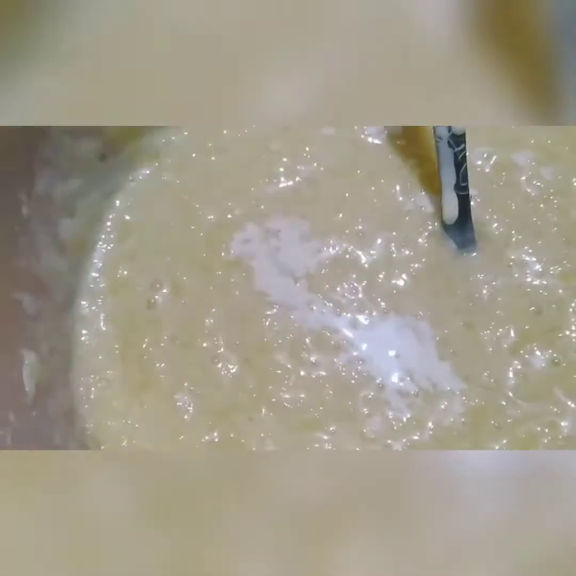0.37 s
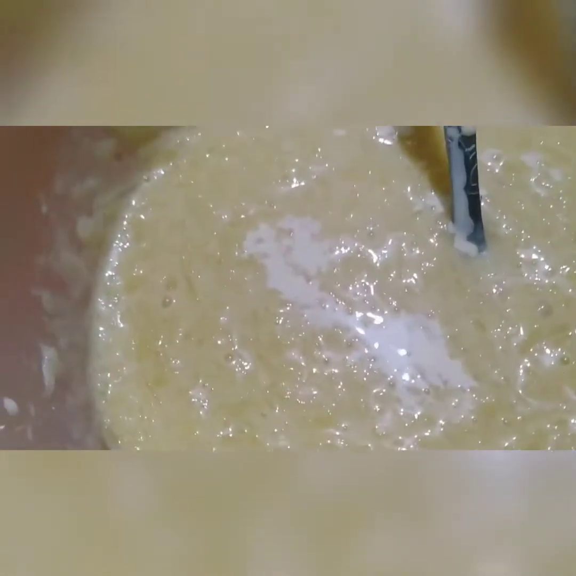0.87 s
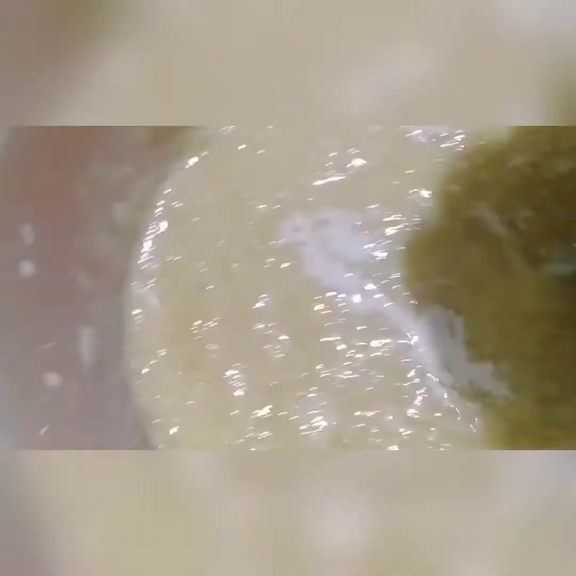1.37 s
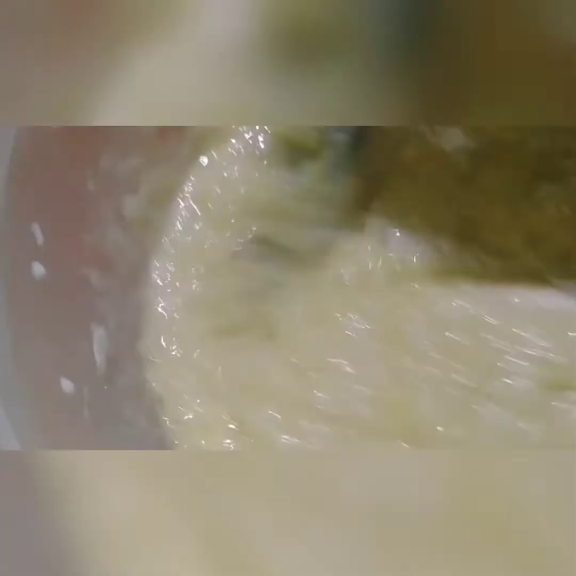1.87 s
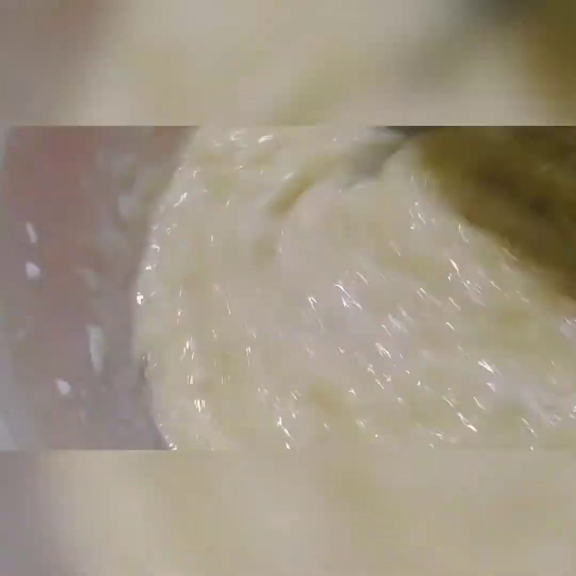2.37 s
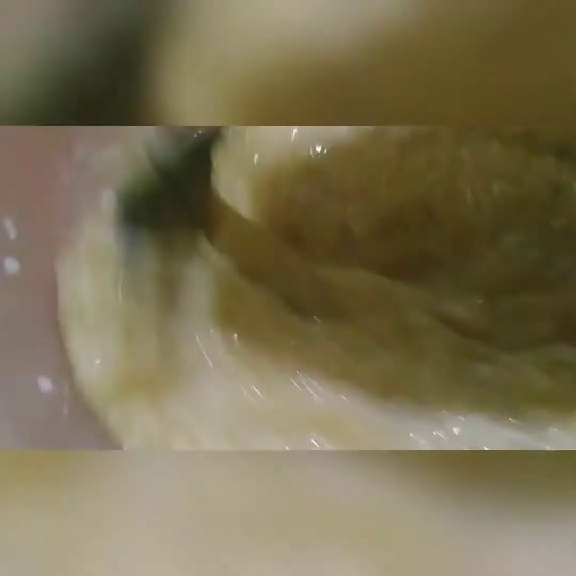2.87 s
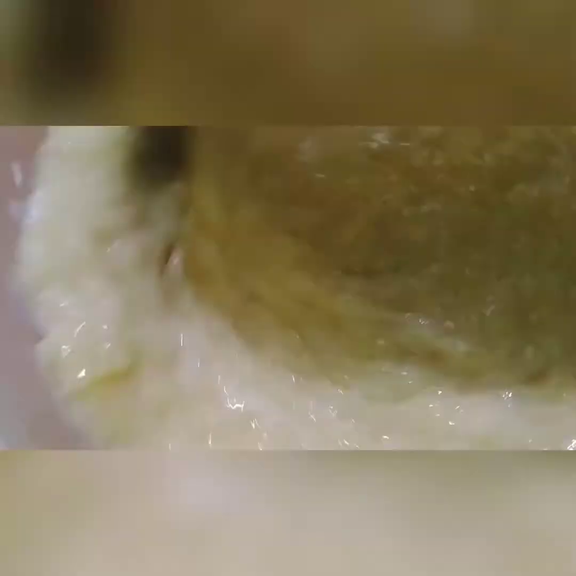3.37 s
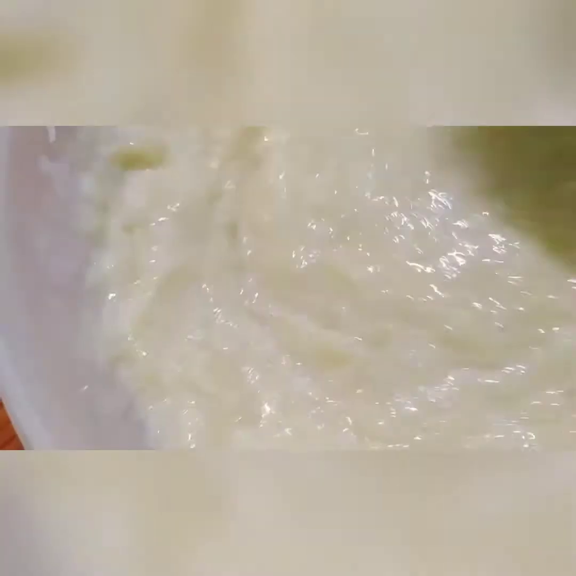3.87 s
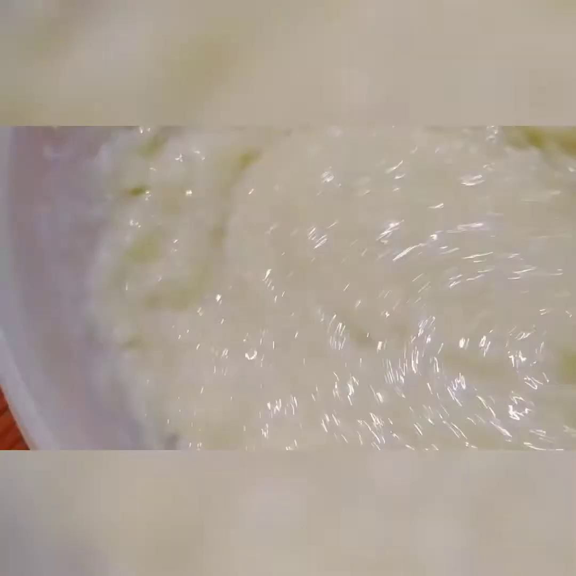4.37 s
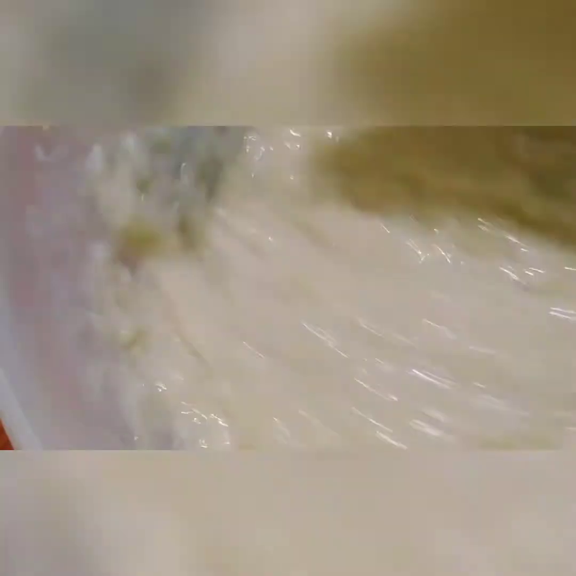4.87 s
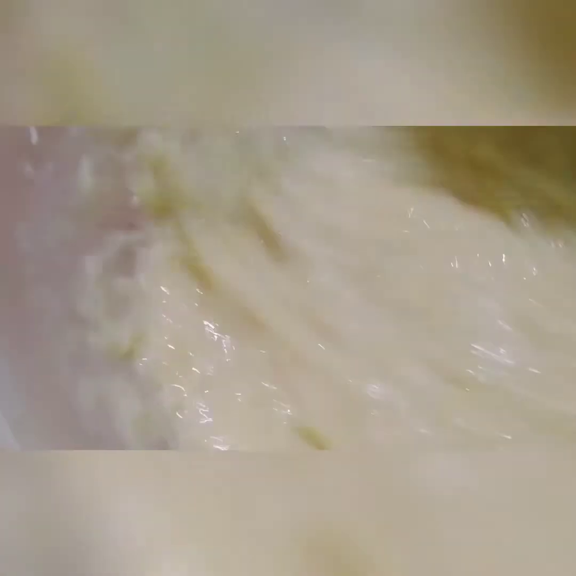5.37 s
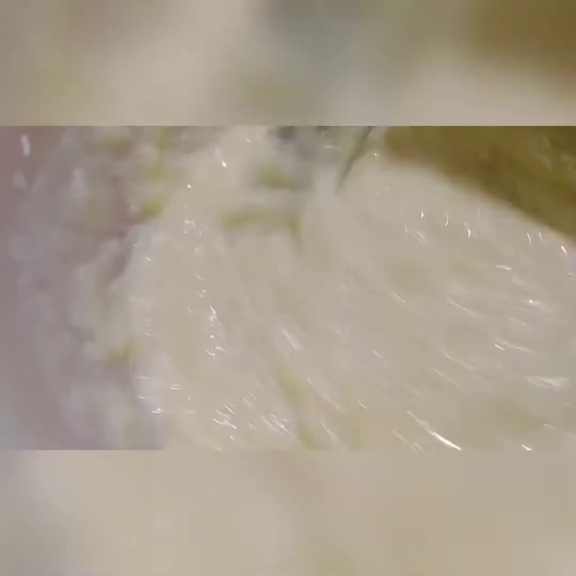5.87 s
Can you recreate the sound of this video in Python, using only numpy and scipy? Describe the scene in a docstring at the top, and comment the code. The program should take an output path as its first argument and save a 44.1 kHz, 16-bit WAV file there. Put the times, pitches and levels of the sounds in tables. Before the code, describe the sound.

In a small kitchen, an appliance hums with a faint passing whistle while something knocks hollowly on the counter, a cluster at the start and more after one second. From about two seconds a metal spoon beats thick batter in a plastic bowl, close to a phone microphone, with dull thuds, short rasping scrapes, clicks and wet hiss until the end.

```python
"""A kitchen, with a phone microphone close to a plastic bowl of thick batter and the counter farther off.
An appliance hums throughout, as wavering noise with a faint whistle; from the start to 1.9 s something
is knocked on the counter, as decaying sines with rattling noise. From 2.1 s a metal spoon beats the batter:
it lands with damped thuds, drags as fine grains that shake the bowl's modes, and catches in small slips.
Wet hiss, bursting bubbles and a few groans of the wall go with the beating."""
import sys
import numpy as np
from scipy import signal
from scipy.fft import rfft, irfft, next_fast_len
from scipy.io import wavfile

SR = 44100
rng = np.random.default_rng(int(sys.argv[2]) if len(sys.argv) > 2 else 0)


def ratio_of_db(decibels):
    """Turn decibels (scalar or array-like) into linear amplitude factors; 0 dB maps to 1."""
    return 10 ** (np.asarray(decibels, float) / 20)


def store_pcm(level_fs):
    """Save levels as 16-bit WAV."""
    pcm = np.round(np.clip(level_fs, -1, 1) * 32767).astype(np.int16)
    wavfile.write(sys.argv[1], SR, np.atleast_2d(pcm).T)


N = 264159   # samples

FLICKER_DB = 1.8   # how much hiss and whistle waver
SPREAD_DB = 2.5   # how much a mode's strength varies from event to event
DETUNE = 0.06   # share by which the batter shifts a mode


def rms_one(x):
    """Scale to unit rms."""
    return x / np.sqrt(np.mean(x ** 2) + 1e-20)


def in_time(rows):
    """Columns of a curve at every sample."""
    s, *columns = np.transpose(rows)
    return [np.interp(np.arange(N) / SR, s, c) for c in columns]


def drift(rate):
    """Slow chance of unit rms: white noise through two equal one-pole low-passes at rate Hz."""
    r = np.exp(-2 * np.pi * rate / SR)
    slow = signal.lfilter([1], [1, -2 * r, r * r], rng.standard_normal(N + SR))
    return rms_one(slow[SR:])


def coloured(spectrum):
    """Noise of unit rms, shaped by a spectrum that is interpolated over log frequency."""
    hz, level_db = np.transpose(spectrum)
    size = next_fast_len(N)
    log_hz = np.log(np.maximum(np.fft.rfftfreq(size, 1 / SR), 1))
    gain = ratio_of_db(np.interp(log_hz, np.log(hz), level_db))
    return rms_one(irfft(rfft(rng.standard_normal(size)) * gain, size)[:N])


def band(x, low_hz, high_hz):
    """Band-pass."""
    return signal.sosfilt(signal.butter(2, [low_hz, high_hz], "band", fs=SR, output="sos"), x)


def ring(force, hz, t60):
    """A resonance: a unit click sets a decaying sine of height 1 ringing."""
    r, w = ratio_of_db(-60 / (t60 * SR)), 2 * np.pi * hz / SR
    return signal.lfilter([0, np.sin(w)], [1, -2 * r * np.cos(w), r * r], force + 1e-18)


def clicks(times, gains):
    """One click per event."""
    out = np.zeros(N)
    np.add.at(out, np.minimum(np.round(times * SR).astype(int), N - 1), gains)
    return out


def soften(force, contact_s):
    """A contact lasts a moment: the force swells and fades."""
    shape = np.sin(np.pi * np.clip(np.arange(400) / (contact_s * SR), 0, 1)) ** 2
    return signal.fftconvolve(force, shape / shape.sum())[:N]


def strike(modes, times, levels_db, spread_db, contact_s, detune=0):
    """Every event strikes every mode with a strength, and under batter a pitch, of its own."""
    hz, mode_db, t60 = np.transpose(modes)[:, :, None]
    chance = rng.standard_normal((len(times), 2, len(modes), 1))
    t = np.arange(int(t60.max() * SR) + 400) / SR
    out = np.zeros(N + SR)
    levels_db = np.reshape(levels_db, (len(times), -1, 1))   # one for all modes, or one for each
    for s, level_db, (strength, shift) in zip(times, levels_db, chance):
        decay = ratio_of_db(level_db + mode_db + spread_db * strength - 60 * t / t60)
        rings = decay * np.sin(2 * np.pi * hz * (1 + detune * shift) * t)
        out[int(s * SR):][:len(t)] += rings.sum(axis=0)
    return soften(out, contact_s)


def puff(times, levels_db, t60):
    """Envelope that jumps at each event and dies away."""
    return signal.lfilter([1], [1, -ratio_of_db(-60 / (t60 * SR))], clicks(times, ratio_of_db(levels_db)) + 1e-18)


# colour of the hum: f/Hz, relative level/dB per Hz
HUM = [(18, -83), (30, -56), (112, -6.5), (142, -3), (206, -3), (323, -14), (533, -17), (752, -23),
       (1030, -22.5), (1570, -25), (1750, -24.5), (1940, -27), (5740, -54), (7470, -49.5), (16500, -51.5)]
# loudness of the hum, before a slight drift: t/s, level/dB
HUM_LEVEL = [(0.0, -42), (0.38, -52), (2.9, -47.5), (4.44, -52), (5.44, -44.5), (5.99, -48.5)]
# faint whistle that comes and goes, before it wavers: start t/s, end t/s, start f/Hz, end f/Hz, level/dB
WHISTLE = [(.2, 0.94, 1703, 1800, -67), (1.66, 1.9, 2680, 2650, -69.5)]
# thin band of hiss above the hum, before it wavers: centre f/Hz, width f/Hz, level/dB
WHINE = (7520, 500, -85)


def appliance():
    """Broad hum that wavers, with a gliding sine for the whistle and a narrow noise band."""
    t, whistle = np.arange(N) / SR, 0
    waver, wobble_hz = ratio_of_db(FLICKER_DB * drift(10)), 12 * drift(24)
    for start, end, from_hz, to_hz, whistle_db in WHISTLE:
        on = np.clip(np.minimum(t - start, end - t) / 0.04, 0, 1)   # fades over 0.04 s
        hz = np.interp(t, [start, end], [from_hz, to_hz]) + wobble_hz
        whistle = whistle + ratio_of_db(whistle_db) * on * waver * np.sin(2 * np.pi * np.cumsum(hz) / SR)
    centre, width, whine_db = WHINE
    whine = rms_one(band(rng.standard_normal(N), centre - width / 2, centre + width / 2))
    whine *= ratio_of_db(whine_db + 2.0 * drift(27))
    hum = ratio_of_db(in_time(HUM_LEVEL)[0] + 0.13 * drift(5.1)) * coloured(HUM)
    return hum + whistle + whine


# knocks on the counter, relative levels:
# t/s, ring level/dB, boom level/dB, body level/dB, crack level/dB
KNOCKS = [(0.0024, -33, -16.5, -37, -35), (0.0314, -23.5, -61, -38.5, -51), (0.171, -21.5, -22, -39, -31.5),
          (0.1889, -32, -60, -42, -75), (0.3573, -59, -67, -70, -52.5), (1.0471, -33.5, -47, -41.5, -60),
          (1.082, -24.5, -41, -33, -58.5), (1.291, -35, -50, -37, -78), (1.3053, -36.5, -47, -41.5, -69),
          (1.4209, -27.5, -38, -50, -34), (1.4386, -23.5, -39.5, -31.5, -42.5),
          (1.6463, -57, -51, -72, -70), (1.6611, -36.5, -33.5, -47.5, -87), (1.8966, -45.5, -52, -58, -60)]
# modes of the counter and what stands on it: f/Hz, relative level/dB, t60/s
COUNTER = [(164.4, 4, 0.13), (253, -12, 0.29), (487.6, 0, 0.14), (658, -6.5, 0.33), (928, -6.5, 0.16),
           (1190, -35, 0.11), (1541, 5, 0.067), (1727, 0.5, 0.065), (1920, -13, 0.02), (2270, -5, 0.064),
           (2500, -27, 0.014), (2680, 2.5, 0.044), (3070, 2.5, 0.022)]


def knocks():
    """Hollow knocks: a boom, a body, a cluster of high modes and a rattle."""
    at, ring_db, boom_db, body_db, crack_db = np.transpose(KNOCKS)
    boom = strike(COUNTER[:2], at, boom_db - 4.5, SPREAD_DB, contact_s=0.0029)
    body = band(strike(COUNTER[2:5], at, body_db, SPREAD_DB, contact_s=0.001), 446, 1600)
    cluster = band(strike(COUNTER[5:], at, ring_db - 12.5, SPREAD_DB, contact_s=0.00015), 500, 3200)
    # loose things rattle on for a moment, the higher ones unevenly
    low_rattle = soften(puff(at, body_db, t60=0.094), contact_s=0.0028)
    low_rattle *= coloured([(150, -8), (400, 8), (900, 6.5), (1500, 2), (16000, -70)])
    high_rattle = puff(at, ring_db, t60=0.037) + puff(at, ring_db - 24.5, t60=0.11)
    high_rattle = ratio_of_db(2.8 * drift(80)) * soften(high_rattle, contact_s=0.00087)
    high_rattle *= coloured([(600, -77), (1400, 11.5), (2800, 3), (4000, -38), (16000, -40)])
    # a short crack, then a long airy tail from the hard walls
    crack = puff(at, crack_db, t60=0.038) * coloured(
        [(1500, -21), (3000, -1), (4200, -4), (6500, -2), (9000, -4.5), (12000, -13), (16000, -20)])
    airy = puff(at, crack_db - 7, t60=0.28) * coloured(
        [(2500, 21.5), (4000, -1), (7000, 5), (9000, 12.5), (16000, -24)])
    return boom + body + cluster + low_rattle + high_rattle + crack + airy


def kitchen(x):
    """Diffuse echoes, duller as they die: the bright noise decays faster than the dull."""
    dull_t60, bright_t60 = 0.25, 0.59 * 0.25   # s
    t = np.arange(SR // 2) / SR
    tail = rng.standard_normal((2, len(t))) * (t > 0.004)
    dull = signal.lfilter([0.3], [1, -0.7], tail[0]) * ratio_of_db(-60 * t / dull_t60)
    bright = ratio_of_db(11.5) * tail[1] * ratio_of_db(-60 * t / bright_t60)
    echoes = dull + bright
    return signal.fftconvolve(x, echoes / np.sqrt(np.sum(echoes ** 2)))[:N]


# spoon drags along the wall; a start close to a blow moves onto it. Relative levels:
# start t/s, end t/s, rasp level midway/dB, hiss level midway/dB, swell from start to end/dB
STROKES = [(2.117, 2.169, -49, -72, 1.5), (2.161, 2.187, -40.5, -44.5, -9), (2.228, 2.265, -35, -44, -15),
           (2.386, 2.439, -41, -42.5, 11), (2.451, 2.522, -37.5, -45, -14), (2.501, 2.595, -62, -71, -7),
           (2.606, 2.639, -46, -51, -4), (2.639, 2.663, -37, -36.5, -19), (2.692, 2.719, -35.5, -48, -25),
           (2.743, 2.792, -47, -61, -29), (2.816, 2.891, -46.5, -53, 29), (2.943, 2.95, -31, -40, -18),
           (3.096, 3.146, -43.5, -45.5, 13), (3.173, 3.218, -33, -44, -12), (3.367, 3.436, -60, -68, -34),
           (3.488, 3.553, -40, -47, 12), (3.587, 3.641, -38, -51, -6), (3.633, 3.698, -42.5, -63, 0.5),
           (3.763, 3.861, -50.5, -65.5, 13), (3.87, 3.937, -43.5, -45, 13), (3.939, 3.995, -39, -47, -18),
           (4.018, 4.048, -29.5, -44, -8), (4.049, 4.106, -43, -58, -15), (4.307, 4.398, -37.5, -46.5, 10),
           (4.46, 4.533, -38.5, -53.5, -19), (4.622, 4.685, -49.5, -64, 12), (4.71, 4.764, -39.5, -44, 13),
           (4.765, 4.813, -33, -45, 10), (4.851, 4.916, -39, -44.5, -16), (5.09, 5.166, -40, -47.5, 4),
           (5.144, 5.171, -34.5, -51, -20), (5.2, 5.23, -32.5, -43, 3), (5.313, 5.38, -50, -53, -2),
           (5.379, 5.447, -35, -43, -4), (5.478, 5.507, -31, -48, -23), (5.647, 5.685, -43.5, -56, 15),
           (5.681, 5.709, -34.5, -36, -10), (5.732, 5.776, -35, -43, -13), (5.87, 5.892, -51, -50, 12),
           (5.915, 5.963, -31.5, -34.5, -5.5)]


def dragging(levels_db, swells_db, lift_s):
    """Contact strength along each stroke; it fades quickly when the spoon lifts."""
    out = np.zeros(N)
    for (start, end, *_), level_db, swell_db in zip(STROKES, levels_db, swells_db):
        # a stroke that opens with a blow starts on it
        nearest = min((blow[0] for blow in BLOWS), key=lambda s: abs(s - start))
        if abs(nearest - start) < 0.021:
            start = nearest
        a, b = int(start * SR), int(end * SR)
        out[a:b] = ratio_of_db(level_db + swell_db * np.linspace(-0.5, 0.5, b - a)[:N - a])
    r = np.exp(-1 / (lift_s * SR))
    return signal.lfilter([1 - r], [1, -r], out)


def patchy(x, patchy_db):
    """Each band of a noise flickers on its own."""
    edges = np.geomspace(2000, 19000, num=9)
    return sum(band(x, low, high) * ratio_of_db(patchy_db * drift(15.8)) for low, high in zip(edges, edges[1:]))


# colour of the wet hiss: f/Hz, relative level/dB per Hz
HISS = [(2060, -9.5), (3500, -6), (4400, -7.5), (5300, -9.5), (6400, -8), (7700, -8.5), (8400, -5.5),
        (8900, 0.5), (9500, -8.5), (10400, -9.5), (13000, -22), (15200, -4), (15600, -28), (16000, -40)]
# treble hiss that rises a little while the batter is moving: t/s, relative level/dB
SEETHE = [(0, -95.5), (1, -96), (1.9, -67), (5.99, -69)]


def wet_batter():
    """Flickering noise swells with strokes and smacks at landings, slips and chance bubble bursts."""
    hiss_db, swell_db = np.transpose(STROKES)[3:]
    # the hiss follows each stroke's swell, leaning a little more towards its end
    drag = dragging(hiss_db, 2.5 + 0.7 * swell_db, lift_s=0.0017) * ratio_of_db(FLICKER_DB * drift(90))
    # bubbles burst in the batter once the beating starts
    burst_at = np.flatnonzero(rng.random(N) < 5.0 / SR) / SR   # 5 a second on average
    burst_at = burst_at[burst_at > 2.05]
    burst_db = -49.5 + SPREAD_DB * rng.standard_normal(len(burst_at))
    blow_at, edge_db = np.transpose(BLOWS)[[0, 3]]
    slip_at, _, tick_db = np.transpose(SLIPS)
    smack_db = -24 + 0.13 * edge_db   # wet crack of a landing, nearly alike each time
    smacks = puff(np.r_[blow_at, slip_at, burst_at], np.r_[smack_db, tick_db, burst_db], t60=0.02)
    wet = np.hypot(drag + ratio_of_db(in_time(SEETHE)[0]), soften(smacks, contact_s=0.002))
    return wet * patchy(coloured(HISS), patchy_db=FLICKER_DB)


# modes of the bowl full of batter, before each event shifts them: f/Hz, relative level/dB, t60/s
BOWL = [(172.6, -13, 0.086), (344, -17.5, 0.062), (395.2, -6.5, 0.09), (468, -8.5, 0.057),
        (579, -0.5, 0.016), (636, -21, 0.024), (714, -7, 0.028), (835, -13, 0.061), (1560, -8.5, 0.047),
        (1608, -11.5, 0.024), (1690, -6.5, 0.015), (1852, -1.5, 0.013), (2400, -9, 0.018),
        (3021, -12.5, 0.024), (3440, -66, .015), (4440, -31, 0.017)]


def bowl_modes():
    """The bowl's body rings below 1 kHz, its wall and then its rim above."""
    low, high = [m for m in BOWL if m[0] < 1000], [m for m in BOWL if m[0] > 1000]
    return low, high[:4], high[4:]


def wall_and_rim(walls, rims):
    """Keep each part of the ringing to its own band."""
    return band(walls, 1380, 1937) + band(rims, 2750, 6900)


# spoon lands on the bowl wall, relative levels:
# t/s, thud level/dB, slap over thud/dB, edge contact level/dB
BLOWS = [(2.12, -19, -16, -27.5), (2.215, -9.5, -9.5, -32), (2.395, -21.5, -15, -29.5),
         (2.609, -19.5, -17, -29), (2.692, -14, 3, -21.5), (2.831, -22, -7, -21.5), (2.875, -19.5, -2, -35),
         (2.933, -25, 10, -34), (3.086, -22.5, -27, -25.5), (3.174, -16, 2.5, -21.5),
         (3.349, -39, -10, -26.5), (3.488, -28.5, -29, -30), (3.59, -22.5, 4, -23.5),
         (4.012, -14, -3.5, -29), (4.467, -23.5, 3, -17.5), (4.755, -41.5, 15, -40), (4.801, -40, 8, -22.5),
         (4.855, -21, 7, -15), (5.084, -27, -35.5, -22), (5.152, -34, -19, -21.5), (5.201, -10.5, 3, -17),
         (5.384, -11.5, -10, -17), (5.478, -13, 8, -18), (5.65, -19.5, -7, -24), (5.732, -13, -0.5, -21),
         (5.916, -23.5, -4.5, -24.5)]
# soft landings on the far wall favour the lowest modes, hard slaps the next two:
# one value for each of the four lowest modes, level/dB per dB of slap
THUD_LEAN = [-0.23, -0.48, 0.22, .2]


def landings():
    """Thuds move the low modes, edge contact the wall and rim."""
    low, wall, rim = bowl_modes()
    at, thud_db, slap_db, edge_db = np.transpose(BLOWS)
    # the batter cushions each contact, so its force swells and fades within a fraction of a cycle
    lowest_db = thud_db[:, None] + np.outer(slap_db, THUD_LEAN)
    thuds = strike(low[:4], at, lowest_db, SPREAD_DB, contact_s=0.00062, detune=DETUNE / 3)
    thuds += strike(low[4:], at, thud_db + slap_db, SPREAD_DB, contact_s=0.00086, detune=DETUNE)
    walls = strike(wall, at, edge_db, SPREAD_DB, contact_s=0.00017, detune=DETUNE)
    rim_db = edge_db + 6.5 + 0.3 * slap_db   # a harder slap shakes the rim more
    rims = strike(rim, at, rim_db, SPREAD_DB, contact_s=0.00011, detune=DETUNE)
    return wall_and_rim(walls, rims) - band(thuds, 198, 850)


def drag_grains():
    """Thousands of uneven micro-contacts a second, in clusters."""
    sizes = ratio_of_db(3.9 * np.minimum(rng.exponential(1, N), 5)) * rng.choice([-1, 1], N)
    return rms_one(sizes * (rng.random(N) < 2500 * ratio_of_db(3.0 * drift(60)) / SR))


def scraped(modes, push):
    """The batter lies differently at every stroke, so the modes shift and change strength."""
    out = np.zeros(N)
    edges = np.append(0, np.array(STROKES)[:, 1] * SR + 100).astype(int)
    chance = rng.standard_normal((len(STROKES), len(modes), 2))
    for a, b, draws in zip(edges, edges[1:], chance):
        part = np.append(push[a:b], np.zeros(SR // 10))[:N - a]   # room to ring out
        for (hz, mode_db, t60), (shift, strength) in zip(modes, draws):
            gain = ratio_of_db(mode_db - 22.5 + SPREAD_DB * strength)
            out[a:a + len(part)] += gain * ring(part, hz * (1 + DETUNE * shift), t60)
    return out


def rasp(push):
    """The grains of a drag shake the wall and rim modes."""
    _, wall, rim = bowl_modes()
    rasping = scraped(wall + rim, push) + ratio_of_db(-0.5) * band(push, 1960, 2010)
    return band(band(rasping, 1310, 9000), 1310, 9000)


def rumble(push):
    """The grains of drags and presses shake the low modes."""
    return sum(ratio_of_db(mode_db - 30) * ring(push, hz, t60) for hz, mode_db, t60 in bowl_modes()[0])


# the edge catches and slips, relative levels: t/s, catch level/dB, wet tick level/dB
SLIPS = [(2.1688, -27, -36), (2.184, -31, -29), (2.3614, -37, -37), (2.4254, -24, -31), (2.4497, -24, -22),
         (2.5068, -33, -34), (2.5267, -31, -55), (2.5477, -24.5, -42), (2.5802, -24.5, -42),
         (2.6424, -21, -30.5), (2.7447, -30, -30.5), (2.9808, -22.5, -42.5), (2.998, -41, -46.5),
         (3.1972, -15.5, -29.5), (3.217, -17.5, -55), (3.5364, -20.5, -42), (3.6202, -21, -45.5),
         (3.6353, -20, -37.5), (3.8836, -31, -49), (3.902, -24, -41), (3.941, -26, -56),
         (3.9681, -18, -34.5), (3.976, -22, -41), (4.0417, -10.5, -29), (4.0788, -25, -45.5),
         (4.0955, -27.5, -46), (4.3165, -26.5, -28.5), (4.328, -18.5, -33), (4.365, -22, -37),
         (4.3846, -16.5, -46), (4.5266, -22.5, -43), (4.6303, -28.5, -39), (4.659, -28.5, -47),
         (4.789, -11, -30), (4.8612, -9, -55), (4.8653, -8, -38), (4.8743, -6, -31), (4.884, -6, -42.5),
         (4.892, -14, -40.5), (4.8969, -16, -41), (5.022, -44, -40), (5.2236, -24, -28.5), (5.34, -45, -31),
         (5.4401, -11, -26.5), (5.5002, -32, -30.5), (5.555, -39, -45), (5.5725, -33, -35),
         (5.614, -44, -42.5), (5.6884, -6.5, -41), (5.837, -33, -54), (5.873, -38, -29),
         (5.8858, -24.5, -25), (5.905, -35.5, -34.5)]


def slips():
    """Each catch strikes the pressed wall, and the rim joins in by a share of it."""
    _, wall, rim = bowl_modes()
    at, catch_db, _ = np.transpose(SLIPS)
    # while the spoon presses on the wall the ringing is damped sooner
    pressed = [(hz, mode_db, 0.35 * t60) for hz, mode_db, t60 in wall]
    walls = strike(pressed, at, catch_db, SPREAD_DB, contact_s=0.00036, detune=DETUNE)
    rims = strike(rim, at, -7.5 + 0.56 * catch_db, SPREAD_DB, contact_s=0.00035, detune=DETUNE)
    return wall_and_rim(band(walls, 1616, 2210), rims)


# the spoon leans on the wall and makes it groan, relative levels:
# start t/s, length t/s, rumble level/dB, groan level/dB, groan f at start/Hz
PRESSES = [(3.928, 0.066, -48, -32.5, 500), (4.338, 0.028, -41, -37, 433), (2.45, 0.022, -41, -52, 450),
           (5.92, 0.037, -50, -38, 220)]


def presses(grains):
    """Leaning swells and fades: returns the grains' push and a shaky sine groan that sags in pitch."""
    sag = 3.92   # share of its starting pitch lost per second
    shaky = ratio_of_db(3.3 * drift(38))
    push, groans = np.zeros(N), np.zeros(N)
    for start, length, press_db, groan_db, groan_hz in PRESSES:
        t = np.clip(np.arange(N) / SR - start, 0, length)
        lean = np.sin(np.pi * t / length)
        push += grains * ratio_of_db(press_db) * lean
        groans += ratio_of_db(groan_db) * shaky * lean * np.sin(2 * np.pi * groan_hz * t * (1 - sag * t / 2))
    return push, groans


def spoon():
    """The beating: wet hiss, landings, drags, slips and presses on one bowl."""
    rasp_db, _, swell_db = np.transpose(STROKES)[2:]
    grains = drag_grains()
    drag_push = grains * dragging(rasp_db, swell_db, lift_s=0.00022)
    press_push, groans = presses(grains)
    dragged = rasp(drag_push) + rumble(drag_push + press_push)
    return wet_batter() + landings() + dragged + slips() + groans


def scene():
    """The bowl is near and dry, the counter farther and wetter."""
    hum, far, near = appliance(), knocks(), spoon()
    echoes = kitchen(ratio_of_db(-14.5) * near + ratio_of_db(-9.5) * far)
    return (hum + far + near + echoes)[None]


def top_cut(x):
    """Nothing passes above the cut-off."""
    return signal.sosfilt(signal.butter(12, 16810, fs=SR, output="sos"), x)


def record(dry):
    """The microphone cuts the deepest bass and the top."""
    thin = signal.sosfilt(signal.butter(3, 80, "high", fs=SR, output="sos"), dry)
    thin = signal.sosfilt(signal.cheby2(12, 22, 15750, fs=SR, output="sos"), thin)
    return top_cut(thin)


dry = scene()
out = record(dry)
store_pcm(out)
```